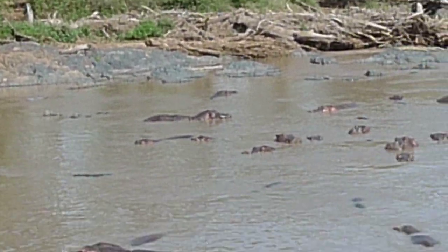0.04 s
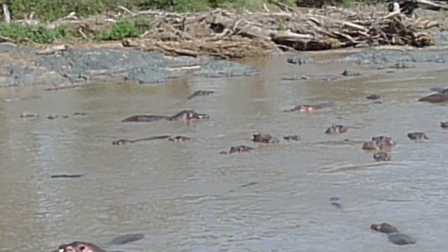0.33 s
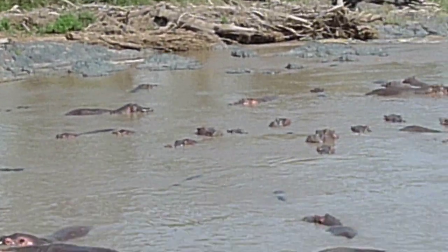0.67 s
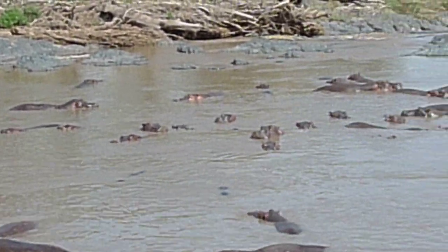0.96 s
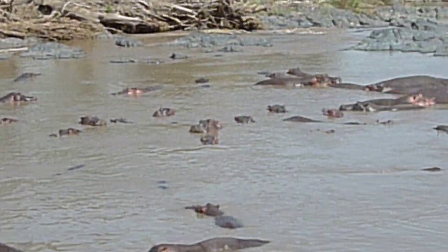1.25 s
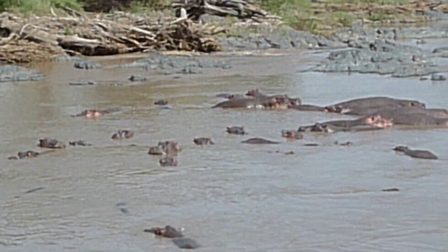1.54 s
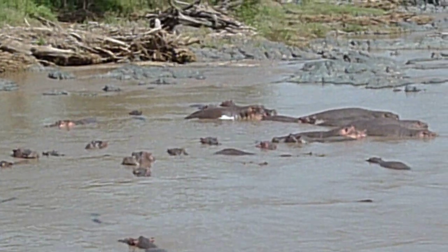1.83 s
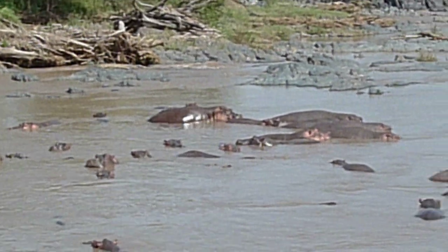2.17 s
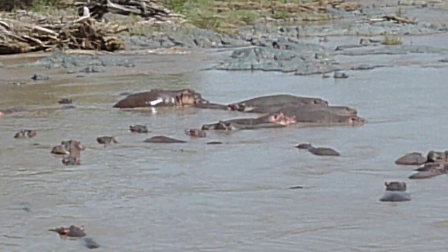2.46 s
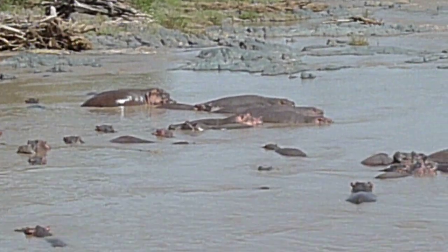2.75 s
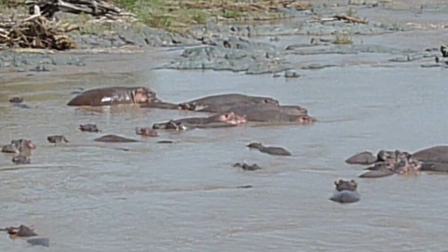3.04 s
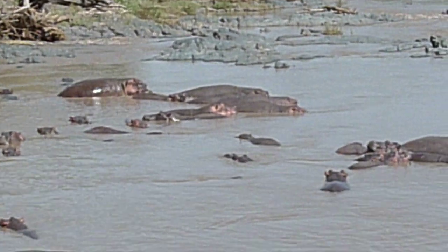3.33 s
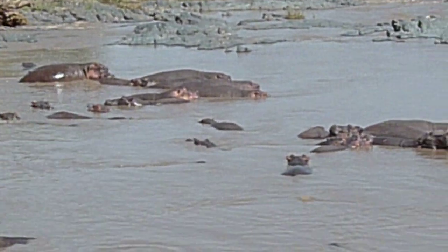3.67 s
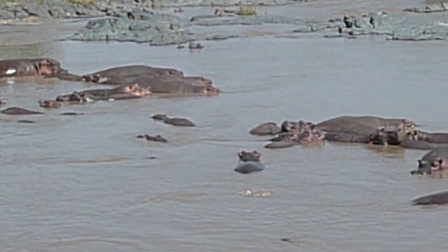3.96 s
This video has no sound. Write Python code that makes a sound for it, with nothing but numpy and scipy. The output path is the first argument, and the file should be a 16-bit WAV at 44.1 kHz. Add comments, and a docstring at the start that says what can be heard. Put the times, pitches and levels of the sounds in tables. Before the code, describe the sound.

A wide river rushes steadily some way off, heard from the bank. Puffs of wind rumble and thump on the microphone, mostly in the first half and again near the end, with a few very faint distant chirps.

```python
"""River and wind on the bank

A wide river rushes some way off: broadband noise of broken water mixed with ringing bubbles.
Puffs of wind rumble on the microphone, and their strongest eddies thump the capsule. A soft hiss swells
over the water, faint far chirps and one low tone come through, and the recorder adds an even hiss."""
import sys
import numpy as np
from scipy import signal
from scipy.fft import rfft, irfft
from scipy.io import wavfile
from scipy.ndimage import uniform_filter1d

SR = 44100
rng = np.random.default_rng(int(sys.argv[2]) if len(sys.argv) > 2 else 0)


def output_pcm(signal):
    """Save a mono or channel-first signal as 16-bit PCM at the path in sys.argv[1].

    Samples are clipped to [-1, 1] before scaling.
    """
    pcm = np.clip(np.atleast_2d(signal).T, -1, 1) * 32767
    wavfile.write(sys.argv[1], SR, np.round(pcm).astype(np.int16))


N = 176400
T = np.arange(N) / SR
BIN_HZ = np.maximum(np.arange(N // 2 + 1) * SR / N, 1)


def undb(db):
    """Amplitude ratio of a level in decibels."""
    return 10 ** (np.asarray(db) / 20)


def unit(x):
    """Normalisation to rms 1."""
    return x / np.sqrt(np.mean(x ** 2))


def colour(x, spectrum):
    """Spectral shaping by (f/Hz, level/dB) points, at rms 1."""
    hz, db = np.array(spectrum).T
    gain = undb(np.interp(np.log(BIN_HZ), np.log(hz), db))
    return unit(irfft(rfft(x) * gain, N))


def noise():
    """Gaussian white noise."""
    return rng.standard_normal(N)


def wander(rate_hz):
    """Random modulation: sample-and-hold noise, smoothed twice, at rms 1."""
    hold = max(int(SR / rate_hz), 1)
    steps = np.repeat(noise()[:N // hold + 1], hold)
    return unit(uniform_filter1d(uniform_filter1d(steps, hold), hold)[:N])


def hump(centre, width):
    """Raised-cosine envelope; the width is taken at half height."""
    return np.cos(np.pi / 2 * np.clip((T - centre) / width, -1, 1)) ** 2


def humps(rows):
    """Incoherent addition: overlapping envelopes sum as powers."""
    return np.sqrt(sum((undb(db) * hump(centre, width)) ** 2 for centre, width, db in rows))


# spectrum of the rush: f/Hz, relative level/dB
RIVER_SPECTRUM = [(20, -34), (60, -12), (120, -2), (220, 0.5), (340, 0.5), (440, -3.5), (520, -.5),
                  (720, -1), (900, -7), (1180, -4), (1460, -12.5), (1700, -11), (1950, -13.5),
                  (2200, -19.5), (2550, -20), (2800, -17), (3000, -20), (3280, -18), (3600, -23.5),
                  (4000, -30.5), (4400, -38), (5200, -47), (8000, -69.5)]
# slow drift of the rush: t/s, level/dB
RIVER_ENVELOPE = [(0, -35.5), (.7, -37.5), (1.05, -35.5), (1.4, -37.5), (2.05, -36.5), (2.3, -37.5),
                  (2.75, -36), (3.05, -37), (3.35, -36), (4, -35.5)]


def river(bands=12, flicker_db=0.87, surge_db=0.2, bubbles_db=-11.5):
    """Broken water radiates broadband noise; its bands flicker independently and surge together."""
    band_position = np.clip(2 * np.log2(BIN_HZ / 100), 0, bands - 1)  # half octaves above 100 Hz
    white = rfft(noise())
    rush = np.zeros(N)
    for k in range(bands):
        band = irfft(white * np.maximum(1 - abs(band_position - k), 0), N)
        rush += band * undb(flicker_db * wander(14))
    water = colour(unit(rush) + undb(bubbles_db) * bubbles(), RIVER_SPECTRUM)
    level_db = np.interp(T, *np.array(RIVER_ENVELOPE).T) + surge_db * wander(6)
    return water * undb(level_db)


def bubbles(per_second=1100, cycles=12.4, pitch_rise=0.096, spread_db=1.5):
    """Each small bubble is a damped resonator whose pitch rises as it rings."""
    crowd = np.zeros(N + SR)
    for when, pitch, size in rng.random((int(per_second * N / SR), 3)):
        hz = 300 + 3700 * pitch
        life = np.linspace(0, 1, int(SR * cycles / hz))
        phase = 2 * np.pi * cycles * (life + pitch_rise * life ** 2 / 2)
        ring = np.sin(phase) * np.exp(-np.log(100) * life)  # decays by 40 dB
        level_db = spread_db * min(-np.log(1 - size), 4)  # capped exponential distribution
        start = int(when * N)
        crowd[start:start + len(ring)] += ring * np.sqrt(hz) * undb(level_db)
    return unit(crowd[:N])


# puffs of wind: centre t/s, width/s, relative level/dB
WIND_PUFFS = [(.075, 0.062, -35), (.495, .04, -30), (.57, 0.17, -36), (.665, 0.056, -30.5),
              (.925, 0.034, -33.5), (1.0, 0.065, -32), (1.14, 0.14, -29), (1.268, 0.052, -31),
              (1.395, 0.054, -32.5), (1.495, 0.037, -30), (1.98, 0.026, -38), (2.05, .04, -34),
              (2.15, 0.077, -39.5), (2.32, 0.041, -40.5), (2.44, 0.098, -38), (3.37, .04, -31.5),
              (3.44, .11, -29.5), (3.79, 0.053, -43), (3.99, 0.071, -34.5)]
# spectrum of the wind rumble: f/Hz, relative level/dB
RUMBLE_SPECTRUM = [(15, -32), (30, -10.5), (60, -0.5), (100, 1.5), (180, -6), (250, -10.5), (350, -22.5),
                   (700, -47.5), (2000, -87)]


def wind(puffs_db=-1.5, breeze_db=-48, wander_db=1, turbulence_db=0.5):
    """Turbulent pressure at the microphone port rumbles, faintly in the breeze and strongly in puffs."""
    breeze = undb(breeze_db + wander_db * wander(8))
    strength = undb(puffs_db) * humps(WIND_PUFFS) + breeze
    rumble = colour(noise(), RUMBLE_SPECTRUM)
    running_rms = np.sqrt(uniform_filter1d(rumble ** 2, size=SR // 25) + 1e-6)
    return rumble / running_rms * strength * undb(turbulence_db * wander(70))


# eddies striking the capsule: centre t/s, relative level/dB, f/Hz
EDDY_THUMPS = [(.077, -21.5, 148), (0.4998, -11.5, 166), (.651, -21, 128), (1.020, -21.5, 187),
               (1.063, -17.5, 208), (1.101, -13, 135), (1.38, -20.5, 131), (1.401, -22, 180),
               (3.436, -19, 145), (3.448, -15, 142), (3.995, -21, 127)]


def eddies(sigma_cycles=0.46, gain_db=0.5):
    """A passing eddy is a pressure pulse: a quick suction, then a push, under a Gaussian envelope."""
    thumps = np.zeros(N)
    for centre, db, hz in EDDY_THUMPS:
        cycles = (T - centre) * hz
        envelope = np.exp(-(cycles / sigma_cycles) ** 2 / 2)
        thumps += undb(db) * envelope * np.sin(2 * np.pi * cycles)
    return undb(gain_db) * thumps


# pitch arch of the low tone: t/s, f/Hz
TONE_GLIDE = [(.24, 170), (.29, 236), (.32, 309.7), (.35, 280), (.39, 172), (.43, 125)]


def low_tone(level_db=-35, waver=0.049):
    """Frequency modulation: a faint low tone rises and falls once, wavering at random."""
    hz = np.interp(T, *np.array(TONE_GLIDE).T) * (1 + waver * wander(149.3))
    phase = 2 * np.pi * np.cumsum(hz) / SR
    return undb(level_db) * hump(centre=0.335, width=0.17) * np.sin(phase)


# swells of soft hiss: centre t/s, width/s, level/dB
HISS_SWELLS = [(.94, 0.42, -54.5), (2.21, .08, -56), (2.74, .14, -56), (3.38, .28, -57.5)]
# spectrum of the swells: f/Hz, relative level/dB
SWELL_SPECTRUM = [(500, -19.5), (1400, -11.5), (2100, 0), (2700, -10.5), (3300, -5), (3900, -6),
                  (4500, -22), (6000, -43.5)]


def swells():
    """Amplitude-modulated noise: a soft high hiss comes and goes over the water."""
    return colour(noise(), SWELL_SPECTRUM) * humps(HISS_SWELLS)


# faint far chirps: centre t/s, width/s, f/Hz, level/dB
FAR_CHIRPS = [(1.445, 0.022, 3290, -51), (1.717, 0.028, 2690, -55), (2.189, 0.031, 3440, -52),
              (2.228, .03, 3260, -54), (3.447, 0.023, 2360, -50.5), (3.563, 0.023, 1980, -51)]


def chirps(blur_hz=170):
    """Spectral broadening: random modulation blurs the pitch of each chirp, as distance does."""
    calls = np.zeros(N)
    for centre, width, hz, db in FAR_CHIRPS:
        phase = 2 * np.pi * hz * T
        narrowband = wander(2 * blur_hz) * np.sin(phase) + wander(2 * blur_hz) * np.cos(phase)
        calls += undb(db) * hump(centre, width) * narrowband
    return calls


def scene():
    """Superposition of the distant river, the wind at the microphone and the faint sounds, in mono."""
    return (river() + wind() + eddies() + low_tone() + swells() + chirps())[None]


# spectrum of the recorder's hiss: f/Hz, relative level/dB
SELF_NOISE_SPECTRUM = [(1000, -2), (7200, 0), (7900, -4), (8400, -14.5), (9000, -28.5)]


def record(dry, hiss_db=-67.5, cutoff_hz=8700):
    """Self-noise and band limiting: the recorder adds an even hiss and cuts the top."""
    hiss = undb(hiss_db) * colour(noise(), SELF_NOISE_SPECTRUM)
    lowpass = signal.ellip(8, 0.3, 70, cutoff_hz, fs=SR, output="sos")
    return signal.sosfilt(lowpass, dry + hiss)


dry = scene()
out = record(dry)
output_pcm(out)
```